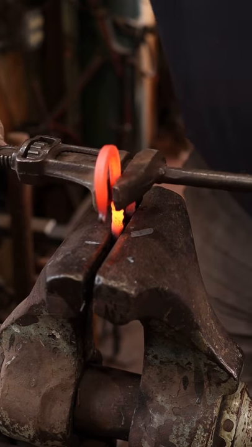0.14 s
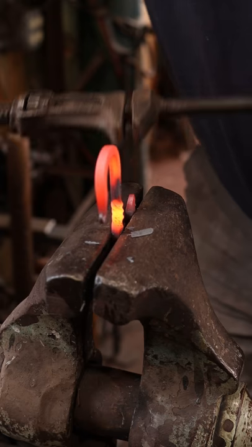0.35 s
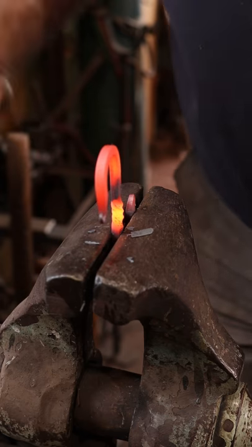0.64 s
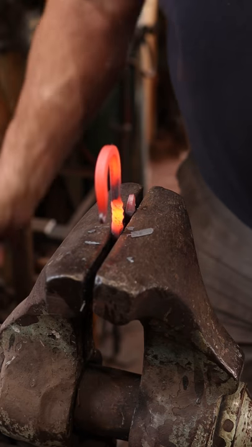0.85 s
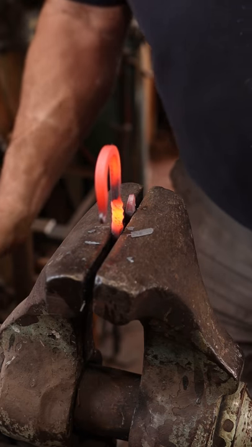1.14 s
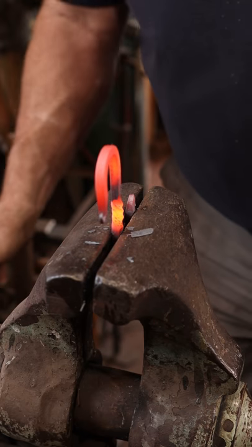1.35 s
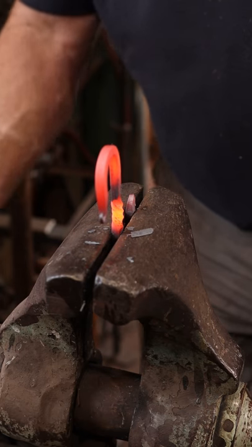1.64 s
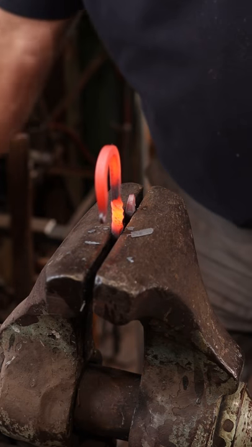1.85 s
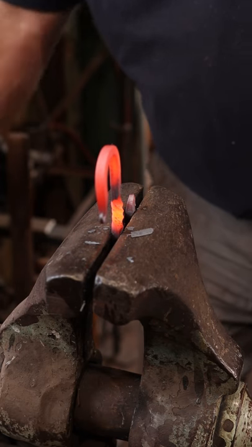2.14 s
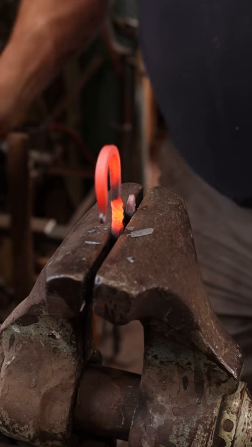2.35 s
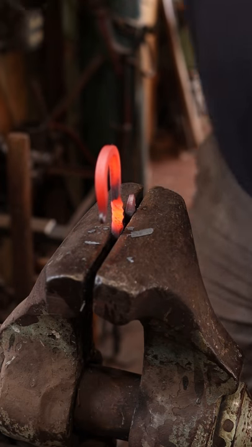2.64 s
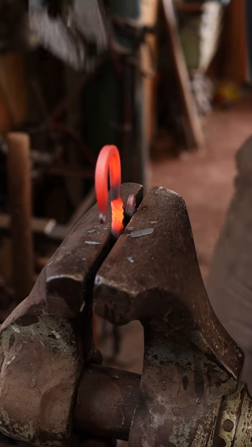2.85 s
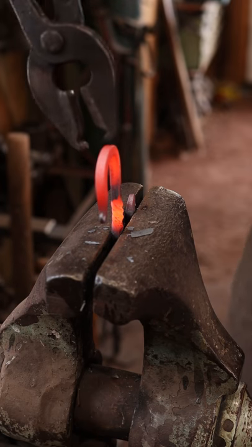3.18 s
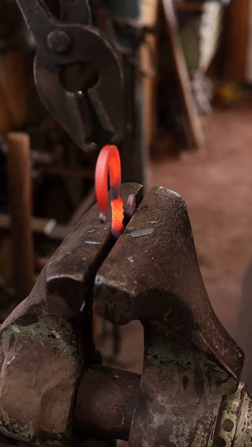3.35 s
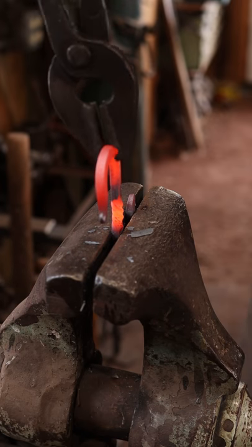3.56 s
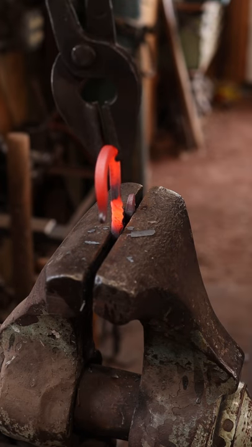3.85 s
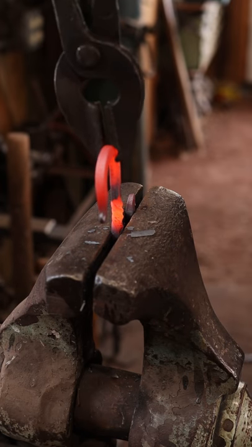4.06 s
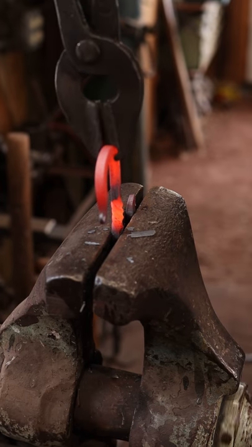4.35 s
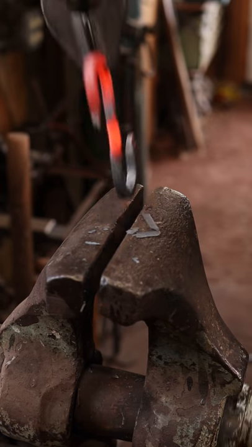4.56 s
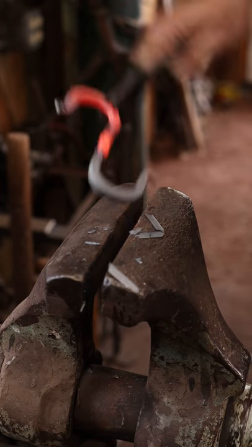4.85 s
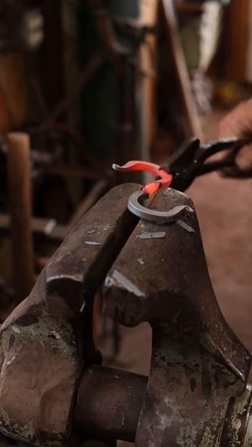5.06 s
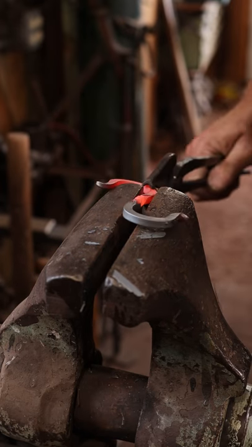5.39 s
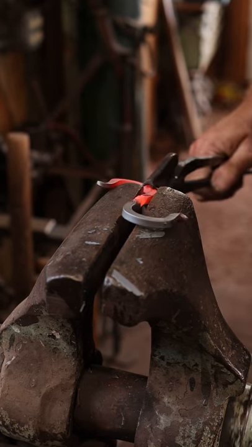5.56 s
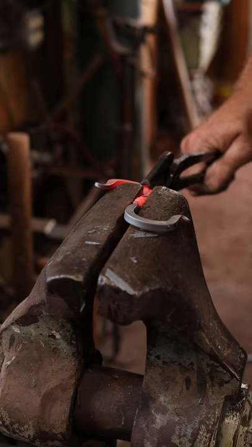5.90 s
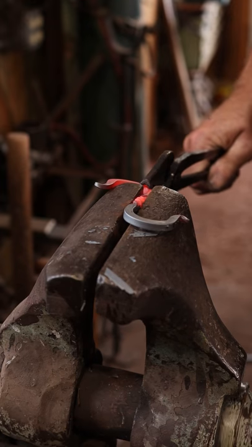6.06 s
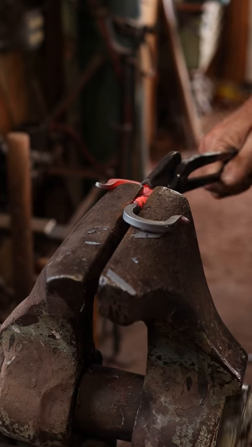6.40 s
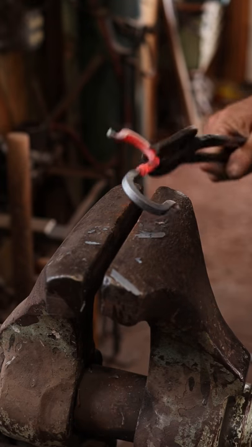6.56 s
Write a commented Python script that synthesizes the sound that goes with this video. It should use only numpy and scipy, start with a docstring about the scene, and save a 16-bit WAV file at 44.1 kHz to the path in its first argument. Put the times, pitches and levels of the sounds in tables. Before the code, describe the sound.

In a quiet smithy, a steel wrench clatters sharply among tools on a bench, then tongs clink and a loose vise handle rattles and knocks.

```python
"""Still air and faint scraping, then scale ticks and clothes and shoes rustle: a smith's shop, heard close by.
A wrench is pulled off a hot hook, put down and clatters among tools on a steel bench; tongs are picked up,
the loose vise handle is turned, slides and drops. Blows are decaying modes over shaped noise; scraping,
groans, rustle and rumble are shaped, wavering noise. The steel echoes in the shop; the highest peaks flatten."""
import sys
import numpy as np
from scipy import signal
from scipy.fft import rfft, irfft, next_fast_len
from scipy.io import wavfile
from scipy.ndimage import map_coordinates

SR = 44100
rng = np.random.default_rng(int(sys.argv[2]) if len(sys.argv) > 2 else 0)


def persist_wave(psi):
    """Save psi, clipped to +-1, as 16-bit WAV."""
    counts = np.round(np.clip(psi, -1, 1) * 32767).astype(np.int16)
    wavfile.write(sys.argv[1], SR, np.atleast_2d(counts).T)


def voltage_ratio(decibels):
    """Convert decibels (scalar or array-like) to amplitude ratios, 20 dB per decade."""
    exponent = np.asarray(decibels, float) / 20
    return 10 ** exponent


N = 296793

# Modes of the wrench and of the vise handle. Each row: frequency in Hz, relative level in dB, basic t60 in s,
# gain towards one end in dB, gain towards one side in dB.
WRENCH_MODES = [(656, -19, 0.16, 27.5, 8), (1500, -19, 0.24, 16.5, 2.5), (1884, -10.5, 0.069, 18, 10),
                (2450, 4, 0.042, 8.5, -11), (2480, -2.5, 0.12, 17.5, -12), (3074, -7, 0.099, 10, -13),
                (3440, -7, 0.13, 9.5, 9), (3671, -0.5, 0.13, 16, 5), (3840, -8.5, 0.16, 17.5, 7.5),
                (4160, -12.5, 0.26, 20.5, 3), (4253, -19, 0.12, 12, -14.5), (4350, -14.5, 0.078, 0.5, -3),
                (5005, -1.5, 0.14, 6.5, 8), (5470, -7, 0.11, 1.5, 17.5), (6360, -22.5, 0.096, -12, -4.5),
                (6620, -8.5, 0.096, 10.5, -1), (6770, -13, 0.12, 0, 3), (6988, -7.5, 0.1, -12, 2.5),
                (7140, -7, 0.18, -9.5, 9.5), (7860, -12, 0.12, 7, 0), (8300, -9, 0.071, -7, -11.5),
                (9647, -20.5, 0.12, 1, -1), (10350, -16, 0.074, -25, -4.5),
                (11750, -19, 0.084, -20.5, -5.5), (11200, -23.5, 0.075, -8, -3),
                (12300, -23.5, 0.13, -27.5, -2), (13200, -26, 0.08, -5, -8), (13905, -25, 0.12, -28.5, 1.5),
                (15700, -28.5, 0.08, -29.5, 6), (14695, -29.5, 0.08, -29, 9)]
HANDLE_MODES = [(560, -19, 0.079, 33, -3.5), (760, -15.5, 0.2, 12.5, 8), (1273, -15, 0.14, 8, -17.5),
                (1460, -7.5, 0.12, 24, 5.5), (1840, 1, 0.05, 0.5, -2), (2200, -10, 0.14, 18, -0.5),
                (2369, -9.5, 0.042, 15, 13.5), (2514, -10, 0.094, 13, 2.5), (2869, -4, 0.14, 2.5, 2),
                (3074, 2.5, 0.063, -0.5, -17), (3180, -2.5, 0.13, 3.5, -6), (3330, -1, 0.15, 0, -4),
                (3600, -3.5, 0.072, 7, -4), (3784, -1.5, 0.11, 2, -5), (4549, -1.5, 0.097, 1, -9),
                (4830, -14, 0.12, 7, -4.5), (4780, -7, 0.08, 0, -4), (5310, -7.5, 0.079, -7, 1),
                (5350, -9, 0.059, -4, 2.5), (5770, -11.5, 0.11, -6, -3.5), (6190, -6, 0.097, -21, -7),
                (6310, -5, 0.1, -24.5, 6), (7050, -18.5, 0.092, -8, 4.5), (8070, -13.5, 0.12, -10.5, -8.5),
                (8300, -11.5, 0.12, -11.5, -5.5), (9200, -25, 0.09, -0.5, 12),
                (10030, -19, 0.1, -9.5, -1.5), (10760, -23, 0.072, -18, 15), (12300, -29, 0.09, -4, 9),
                (15100, -30, 0.08, -5.5, 7)]
# Tools dragged over bench and vise. Each row: time in s, scraping level in dB, bench groan level in dB.
DRAGGING = [(0.0, -69.5, -69), (0.28, -72, -67), (0.41, -56, -50.5), (0.51, -67.5, -86), (0.92, -69.5, -76),
            (1.1, -47, -69), (1.37, -65.5, -66.5), (1.65, -77, -70.5), (1.78, -23, -41.5),
            (1.99, -49.5, -57), (2.08, -63.5, -55.5), (2.51, -71.5, -76.5), (3.15, -54.5, -55.5),
            (3.3, -69, -66.5), (3.74, -45, -47.5), (3.84, -53.5, -47.5), (3.94, -35, -42.5),
            (4.05, -54, -52), (4.29, -68, -59.5), (4.5, -51, -57.5), (4.97, -72, -65.5), (5.1, -57, -64.5),
            (5.55, -72, -62), (5.73, -50.5, -53), (6.0, -70.5, -60.5), (6.45, -64.5, -67), (6.58, -55, -58),
            (6.73, -70, -65)]


def unit(x):
    """Scaled to rms 1."""
    return x / np.sqrt(np.mean(x ** 2) + 1e-20)


def along(points, hz):
    """(Hz, value) points read on a log axis."""
    f, v = np.transpose(points)
    return np.interp(np.log(hz + 1), np.log(f + 1), v)


def coloured(spectrum, size):
    """Noise of rms 1 whose spectrum follows (Hz, relative dB per Hz) points."""
    m = next_fast_len(size)
    gain = voltage_ratio(along(spectrum, np.fft.rfftfreq(m, 1 / SR)))
    return unit(irfft(rfft(rng.standard_normal(m)) * gain, m)[:size])


def wobble(rate):
    """A smooth random curve, rate knots a second."""
    knots = rng.standard_normal(int(N * rate / SR) + 4)
    return map_coordinates(knots, [np.arange(N) * rate / SR])


def curves(rows):
    """One value per sample for each column after the time."""
    s, *cols = np.transpose(rows)
    return [np.interp(np.arange(N) / SR, s, c) for c in cols]


def resonated(x, peaks):
    """x through (Hz, width Hz, dB) resonances of alternating sign."""
    m = next_fast_len(len(x) + SR // 4)
    f = np.fft.rfftfreq(m, 1 / SR)
    body = 0
    for k, (centre, width, db) in enumerate(peaks):
        loss = 1j * f * width
        body = body + (-1) ** k * voltage_ratio(db) * loss / (centre ** 2 - f ** 2 + loss)
    return irfft(rfft(x, m) * body, m)[:len(x)]


def still_air():
    """Steady noise with most of its energy low down, under everything else."""
    # Each row: frequency in Hz, relative level in dB per Hz.
    air_spectrum = [(15, -36.5), (25, -13.5), (43, -6), (108, 9), (285, 1), (354, 4.5), (545, -15.5),
                    (1040, -12), (1370, -10.5), (4740, -13.5), (9070, -34), (14400, -30), (16000, -39.5)]
    return voltage_ratio(-69) * coloured(air_spectrum, N)


def floor_rumble():
    """Low noise of the floor, slowly uneven, that comes and goes."""
    # Each row: time in s, level in dB.
    floor_level = [(0.0, -113), (0.41, -56.5), (0.65, -86.5), (0.92, -88), (1.05, -52), (1.27, -57),
                   (1.5, -78), (1.74, -58), (2.06, -89.5), (2.23, -70), (3.3, -69.5), (3.9, -50),
                   (4.05, -51.5), (4.29, -73), (4.61, -58.5), (4.85, -74), (5.23, -61.5), (5.45, -74),
                   (5.92, -64), (6.24, -81), (6.45, -51), (6.6, -67.5)]
    # Each row: frequency in Hz, relative level in dB per Hz.
    rumble_spectrum = [(15, -50.5), (25, -23), (64, -11), (103, -1), (119, 3.5), (140, -4.5), (182, -1.5),
                       (300, -4.5), (390, -33.5), (660, -120)]
    rumble_db, = curves(floor_level)
    return voltage_ratio(rumble_db) * unit(voltage_ratio(2 * wobble(12)) * coloured(rumble_spectrum, N))


def rustle_and_hiss():
    """Treble noise, uneven at two speeds: the rustle of clothes, and the hiss of hard scraping."""
    # Each row: time in s, rustle level in dB.
    clothes_level = [(0.0, -78.5), (0.28, -69.5), (0.92, -76), (1.55, -75.5), (2.06, -79.5), (2.51, -69.5),
                     (3.3, -73), (3.71, -68.5), (3.84, -69), (4.29, -73), (4.61, -63), (4.85, -55.5),
                     (4.97, -65.5), (5.1, -60), (5.38, -74), (5.73, -65), (5.92, -56.5), (6.0, -76),
                     (6.3, -78.5), (6.45, -78.5), (6.58, -63.5)]
    # Each row: frequency in Hz, relative level in dB per Hz.
    cloth_spectrum = [(1760, -31), (3000, -3), (3680, -9.5), (4630, 4), (5180, -3.5), (6620, 2),
                      (10300, -6.5), (13200, -5.5), (16000, -21)]
    scrape_db, _ = curves(DRAGGING)
    cloth_db, = curves(clothes_level)
    hiss_db = -49.5 + 1.8 * (scrape_db + 22.5)  # the hiss grows 1.8 dB per dB of scraping
    noise = unit(voltage_ratio(1.2 * wobble(40) + 1.5 * wobble(610)) * coloured(cloth_spectrum, N))
    return np.hypot(voltage_ratio(cloth_db), voltage_ratio(hiss_db)) * noise


def bench_groan():
    """Uneven noise through the low resonances of vise and bench while tools are dragged over them."""
    # Each row: frequency in Hz, width in Hz, relative level in dB.
    bench_resonances = [(270, 69, -3), (360.6, 45, 2), (575, 78, -4.5), (820, 120, -8.5), (1080, 120, -7.5)]
    _, groan_db = curves(DRAGGING)
    groan = unit(voltage_ratio(2 * wobble(20)) * resonated(rng.standard_normal(N), bench_resonances))
    return voltage_ratio(groan_db) * groan


def sliding(modes, widen):
    """Grit under a sliding tool keeps its modes singing faintly; the grip damps and so widens them."""
    grit = voltage_ratio(4.9 * wobble(400)) * rng.standard_normal(N)
    peaks = [(hz, widen * np.log(1000) / np.pi / t60, db) for hz, db, t60, *_ in modes]
    return unit(resonated(grit, peaks))


def scraping():
    """Gritty, uneven noise of steel dragged over steel, with the modes of the tool in hand below it."""
    # Each row: frequency in Hz, relative level in dB per Hz.
    scrape_spectrum = [(290, -32.5), (500, 1.5), (862, 0), (1850, 0.5), (2530, -3), (3180, 0), (5350, -10),
                       (8270, -31.5), (9000, -24), (11700, -55), (19800, -120)]
    scrape_db, _ = curves(DRAGGING)
    wrench_held = np.arange(N) / SR < 2.0  # from 2 s on the wrench is left lying
    held = np.where(wrench_held, sliding(WRENCH_MODES, widen=4), sliding(HANDLE_MODES, widen=7.9))
    rasp = voltage_ratio(2 * wobble(300)) * coloured(scrape_spectrum, N)
    return voltage_ratio(scrape_db) * unit(voltage_ratio(2 * wobble(30)) * (rasp + voltage_ratio(-3.5) * held))


def strokes():
    """Gritty noise around one pitch, swelling fast and fading; a narrow spread sounds as a squeak or groan."""
    # Each row: start in s, length in s, level in dB, pitch in Hz,
    # octaves off the pitch for 10 dB less (before the limits below).
    scuffs = [(.315, 0.08, -45.5, 2670, 1.14), (2.693, 0.065, -54.5, 1475, 1.3),
              (3.49, 0.119, -45.5, 575, -0.27), (3.63, 0.066, -49, 566, -1.24),
              (3.64, 0.045, -39, 3860, 0.57), (3.7, 0.063, -44, 575, -0.6), (3.76, 0.098, -47.5, 110, 1.2),
              (3.855, 0.059, -36, 333.6, 0.3), (3.97, 0.063, -43.5, 1600, -0.3),
              (4.13, 0.046, -66, 1316, -1.2), (5.14, 0.074, -52.5, 2934, -0.9),
              (5.378, 0.08, -61.5, 2070, 0.5), (6.15, .12, -55, 2200, 1.6), (6.53, 0.083, -63.5, 9100, 1.7)]
    out, size = np.zeros(N + SR), SR // 4
    for s, length, db, hz, octaves in scuffs:
        spread = np.clip(octaves, .01, 2)
        near, far = 8 ** spread, 64 ** spread
        noise = coloured([(hz / far, -70), (hz / near, -30), (hz, 0), (hz * near, -30), (hz * far, -70)], size)
        grit_db = 2.5 * wobble(250)[:size]
        u = np.arange(size) / SR / length  # 0 to 1 over the stroke
        swell = np.clip(6 * u, 0, 1) * np.clip(3 * (1 - u), 0, 1)
        out[round(s * SR):][:size] += voltage_ratio(db + grit_db) * swell * noise
    return out[:N]


def faint_ticks(count):
    """The small flakes in between, at random moments: rows of s, dB, Hz."""
    luck = rng.random((count, 3))
    return [(a * N / SR, -58 + 3.5 * (2 * b - 1), 4800 * 2 ** (c - .5)) for a, b, c in luck]


def scale_ticks():
    """Flakes of scale snap: dry noise bursts around one pitch, lasting a few treble cycles."""
    # The louder flakes. Each row: time in s, level in dB before the common lift of 4 dB, pitch in Hz.
    loud_ticks = [(0.3144, -44, 5750), (0.401, -42.5, 5050), (3.1971, -45.5, 6140), (3.2896, -55, 4330),
                  (3.7995, -34.5, 4625), (4.4437, -44.5, 4030), (4.8274, -44.5, 6840),
                  (4.8674, -38.5, 7290), (5.0859, -39, 8080), (5.2499, -42.5, 4070), (5.3453, -48, 4130),
                  (5.5675, -47.5, 4580), (6.1544, -45, 5090), (6.1639, -48.5, 6570), (6.2068, -36, 4200)]
    out, t = np.zeros(N + SR), np.arange(SR // 50) / SR
    for s, db, hz in [*loud_ticks, *faint_ticks(count=10)]:
        snap = coloured([(hz / 3.5, -28), (hz / 2.1, -5), (hz, 0), (hz * 1.3, -7)], len(t))
        out[round(s * SR):][:len(t)] += voltage_ratio(db + 4 - 60 * t / 0.0019) * snap
    return out[:N]


def struck(blows, modes, freedoms, clatter_per_thud, ring_db, favour_db, linger_db, shiver,
           crack_db, crack_s, chatter_db, chatter_s, thud_db, thud_s):
    """Each blow rings the modes by where it lands, over a crack, a chatter of loose parts and a bench thud."""
    out, t = np.zeros(N + SR), np.arange(SR * 3 // 10) / SR
    hz, level, t60, along_db, across_db = np.transpose(modes)[:, :, None]
    starts, strengths = np.transpose(blows)[:2]
    gaps_s = np.diff(starts, append=N / SR)
    rises_db = np.diff(strengths, append=0)
    for blow, free_s, next_db in zip(blows, gaps_s, rises_db):
        s, db, low_db, spot_along, spot_across, best_hz = blow
        clatter_db = clatter_per_thud * low_db  # what shakes the bench shakes loose parts
        freedom = np.interp(s, *np.transpose(freedoms))
        contact_s = 0.00087 * voltage_ratio(-.25 * (db + 28))  # light touches build up more slowly
        luck = rng.standard_normal((2, *hz.shape))
        strength = level + spot_along * along_db + spot_across * across_db
        favoured = favour_db * np.exp(-(np.log(hz / best_hz) / .02) ** 2)

        # Grip and contact drain most of the ring at once; the remainder lasts longest in the low modes.
        first = voltage_ratio(-60 * t / (t60 * freedom))
        rest = voltage_ratio(linger_db - 60 * t / (2.4 * t60 * (hz / 3000) ** -.35))
        # The next contact stifles what still rings, a light one less.
        choked_db = 60 * np.maximum(t - free_s, 0) / .06 * min(voltage_ratio(next_db + 4), 1)
        # Touching other steel unsettles the phase of each mode.
        steps = rng.standard_normal((len(hz), len(t) // 63))
        drift = np.repeat(shiver * (hz / 3000) ** -.3 * np.cumsum(steps, axis=1), 63, axis=1)
        tones = np.sin(2 * np.pi * hz * t + luck[1] + drift) * voltage_ratio(strength + favoured + 2 * luck[0])
        ring = (tones * (first + rest)).sum(axis=0) * voltage_ratio(-choked_db)

        # A spot that favours the high modes brightens crack and chatter too.
        treble_db = strength[hz > 9000].mean() - strength[(hz > 2000) & (hz < 6000)].mean()
        bright = [(100, -60), (400, -29), (1500, -15), (2300, 9.5), (5500, 7.5),
                  (10000, treble_db + 7), (16000, treble_db - 9)]
        duller = [(100, -56.5), (400, -26.5), (1200, -13.5), (2300, 1), (5500, -4),
                  (10000, treble_db - 4.5), (16000, treble_db - 17)]
        low = [(25, -70), (60, -39.5), (300, -5.5), (700, 1.5), (1500, -0.5), (2600, -3.5), (6000, -49.5)]
        crack = voltage_ratio(clatter_db + crack_db - 60 * t / crack_s) * coloured(bright, len(t))
        chatter = voltage_ratio(clatter_db + chatter_db - 60 * t / chatter_s) * coloured(duller, len(t))
        thud = voltage_ratio(low_db + thud_db - 60 * t / thud_s) * coloured(low, len(t))
        onset = 1 - np.exp(-t / contact_s)
        out[round(s * SR):][:len(t)] += voltage_ratio(db) * (voltage_ratio(ring_db) * ring + crack + chatter + thud) * onset
    return out[:N]


def vise_handle():
    """The loose handle turns, slides and drops: its modes, struck, ring longer where it swings loose."""
    # Each row: start in s, strength in dB, thud over it in dB before the common thud level,
    # spot along and spot across the handle from -1 to 1, favoured mode in Hz.
    handle_blows = [(3.0725, -55, 7, 0.9, 0.36, 2514), (3.0985, -51.5, 7.5, 0.84, -0.48, 3600),
                    (3.1309, -48, 8, 0.92, -0.97, 2200), (3.3499, -40.5, -6, -0.06, 1, 5350),
                    (3.51, -53, 8, 0.7, -0.074, 560), (3.5604, -46.5, -5.5, 0.26, 0.54, 2369),
                    (3.624, -47.5, -0.5, 0.36, 0.42, 2200), (3.6437, -43, -2.5, 0.49, 0.67, 3784),
                    (3.665, -38.5, -13, -0.033, 0.89, 2369), (3.7051, -30, -0.5, 0.3, -0.33, 4780),
                    (3.8612, -29.5, 2.5, -0.081, -0.21, 5350), (3.8852, -35, 9.5, 0.09, -0.74, 4549),
                    (3.905, -37, 3.5, 0.64, 0.14, 5350), (3.977, -54, 23, 1, 0.038, 1460),
                    (4.4205, -64.5, 6, 0.75, 0.2, 2200), (4.4803, -60.5, 17, 0.29, -0.3, 8300),
                    (4.5761, -54.5, 9, 0.82, -0.13, 2869), (5.0565, -46.5, -2, 0.01, 0.45, 6190),
                    (5.1408, -39, 3.5, 0.29, 0.16, 3074), (5.3723, -63, 7.5, 0.38, 0.31, 1460),
                    (5.4845, -56, 10.5, 0.78, 0.49, 760), (5.58, -60, 10.5, 0.86, -0.42, 3074),
                    (5.5943, -47.5, -1.5, 0.69, -0.21, 3600), (5.6162, -18.5, -8.5, -0.41, -0.61, 4549),
                    (5.626, -18.5, -14.5, -0.32, -0.56, 6190), (6.362, -66, 14, 0.68, -0.33, 4549),
                    (6.3845, -60.5, -4.5, 1, -0.0047, 9200), (6.4049, -19, -6, -0.56, -0.44, 6310),
                    (6.4105, -21, -3.5, -0.1, 0.13, 5350)]
    # How freely it rings. Each row: time in s, factor on the basic t60.
    handle_freedom = [(3.1, 0.35), (3.5, 0.69), (3.86, 0.62), (3.98, 1.37), (5.1, 0.25), (5.616, 0.9),
                      (5.627, 0.27), (6.36, 1), (6.41, 0.4)]
    return struck(handle_blows, HANDLE_MODES, handle_freedom, clatter_per_thud=0.29, ring_db=-1, favour_db=10,
                  linger_db=-19, shiver=0.41, crack_db=6.5, crack_s=0.045, chatter_db=-4.5, chatter_s=0.081,
                  thud_db=-4.5, thud_s=0.2)


def tongs():
    """Tongs are picked up: their modes, struck, are cut short by a low freedom to ring."""
    # Each row: start in s, strength in dB, thud over it in dB before the common thud level,
    # spot along and spot across the tongs from -1 to 1, favoured mode in Hz.
    tongs_blows = [(2.0249, -47, 10, -0.83, -0.12, 2150), (2.0663, -22.5, -20.5, 0.53, -0.52, 3015),
                   (2.075, -34.5, -18, -0.21, 0.8, 3348), (2.1546, -41, 7.5, -0.98, -0.057, 3348),
                   (2.4903, -52.5, -14.5, -0.28, 1, 3015), (2.6974, -74.5, 26.5, -0.53, 0.15, 910)]
    # Each row: frequency in Hz, relative level in dB, basic t60 in s, gain towards one end in dB,
    # gain towards one side in dB.
    tongs_modes = [(910, -11, 0.2, -6, -3), (1710, -1.5, 0.22, -10, -6.5), (2150, -11, 0.34, -21.5, -12.5),
                   (3015, 0.5, 0.11, -9, 5.5), (3348, 0, 0.12, -10.5, -4), (3950, -14.5, 0.18, -23.5, 10),
                   (4200, -1, 0.12, -4, -12.5), (5015, -5.5, 0.12, -10.5, 12.5),
                   (5120, -6, 0.093, -14.5, 3.5), (6040, -1.5, 0.11, -1.5, -5), (6487, -3, 0.093, 2, 1.5),
                   (6670, -2.5, 0.11, -2, 13.5), (7970, -3.5, 0.091, 14, -4), (7700, 0.5, 0.1, 6.5, 5.5),
                   (8300, -4.5, 0.1, 8, 7), (9100, -2, 0.12, 8.5, -5), (9700, -7.5, 0.09, 6, -2.5),
                   (9900, -15.5, 0.09, 14, 2), (11600, -8, 0.08, 19, 3.5), (11250, -2.5, 0.085, 23, -5),
                   (12400, -11.5, 0.09, 11, -3.5), (13900, -13.5, 0.08, 14.5, -4.5),
                   (15170, -18, 0.08, 3.5, 7)]
    # How freely they ring. Each row: time in s, factor on the basic t60.
    tongs_freedom = [(2.0, 0.28), (2.075, 0.23), (2.5, 0.49)]
    return struck(tongs_blows, tongs_modes, tongs_freedom, clatter_per_thud=0.77, ring_db=1.5, favour_db=4,
                  linger_db=-34, shiver=0.4, crack_db=14, crack_s=0.022, chatter_db=4, chatter_s=0.1,
                  thud_db=-1.5, thud_s=0.23)


def wrench():
    """The wrench leaves its hook and clatters on the bench: its modes, struck, ring longer once it is let go."""
    # Each row: start in s, strength in dB, thud over it in dB before the common thud level,
    # spot along and spot across the wrench from -1 to 1, favoured mode in Hz.
    wrench_blows = [(0.5108, -61, 6.5, 0.04, 0.32, 3440), (0.6061, -34, -13, -0.37, 1, 5470),
                    (0.6336, -20, -35, -0.83, -0.15, 14695), (0.8017, -41, -11, 0.26, -0.17, 3671),
                    (0.8446, -50, -6, 0.27, -0.87, 2480), (0.891, -53, -7.5, 0.25, -0.02, 3440),
                    (0.9678, -10.5, -16, -0.44, -0.59, 3671), (0.982, -19.5, -26, 0.07, -0.64, 3074),
                    (1.0287, -19, -20.5, -0.11, -0.4, 10350), (1.0526, -29, -12.5, 0.16, -0.26, 7860),
                    (1.1579, -25, -9.5, -0.01, -0.26, 6988), (1.44, -65.5, 0.5, -0.84, -0.1, 9647),
                    (1.5979, -14, -6, -0.14, 0.13, 2480), (1.612, -22, -6.5, 0.05, -0.4, 2450),
                    (1.6687, -22, 0, 0.12, -0.15, 5005), (1.693, -29, 2, -0.03, 0.57, 3671),
                    (1.709, -24.5, 0, 0.13, 0.15, 5005), (1.759, -24.5, -9.5, 0.49, 0.027, 3671),
                    (1.79, -31.5, 0.5, 0.34, 0.14, 3671), (1.821, -20.5, -4, -0.41, 0.56, 2450),
                    (1.8249, -13.5, -17, 0.02, -0.12, 5470), (1.84, -20, -12, 0.07, 0.23, 6620)]
    # How freely it rings. Each row: time in s, factor on the basic t60.
    wrench_freedom = [(0.6, 0.55), (0.89, 0.6), (0.96, 0.4), (1.6, 0.55), (1.69, 1.2), (1.84, 1.1)]
    return struck(wrench_blows, WRENCH_MODES, wrench_freedom, clatter_per_thud=0.25, ring_db=-0.5, favour_db=7,
                  linger_db=-14, shiver=0.46, crack_db=10, crack_s=0.028, chatter_db=-10.5, chatter_s=0.12,
                  thud_db=1, thud_s=0.1)


def shop_echo(x):
    """Each frequency of the room's answer dies at its own speed; every quarter second meets a new tail."""
    # Each row: frequency in Hz, t60 in s.
    room_decay = [(150, 0.41), (1000, 0.15), (3000, 0.21), (8000, 0.17), (15000, 0.22)]
    out, step = np.zeros(N + 2 * SR), SR // 4
    for start in range(0, N, step):
        hz, t, z = signal.stft(rng.standard_normal(SR * 3 // 4), SR, nperseg=256)
        decay = voltage_ratio(-60 * t / along(room_decay, hz)[:, None])
        tail = signal.istft(z * decay, SR, nperseg=256)[1]
        wet = signal.fftconvolve(x[start:start + step], tail / np.linalg.norm(tail))
        out[start + round(.006 * SR):][:len(wet)] += wet  # the answer starts 6 ms late
    return out[:N]


def scene():
    """Steel in its room, over the smith's handling and the still air."""
    background = still_air() + floor_rumble() + rustle_and_hiss()
    dragging = bench_groan() + scraping()
    steel = strokes() + scale_ticks() + vise_handle() + tongs() + wrench()
    return (background + dragging + steel + voltage_ratio(-12.5) * shop_echo(steel))[None]


def low_pass(x):
    """Removes everything above the highest recorded frequency."""
    return signal.sosfilt(signal.butter(12, 16220, fs=SR, output="sos"), x)


def record(dry):
    """The loudest blows clip the recorder: peaks flatten, with a slightly rounded knee, at full scale."""
    flat = dry / (1 + np.abs(dry) ** 12) ** (1 / 12)
    return low_pass(flat)


dry = scene()
out = record(dry)
persist_wave(out)
```